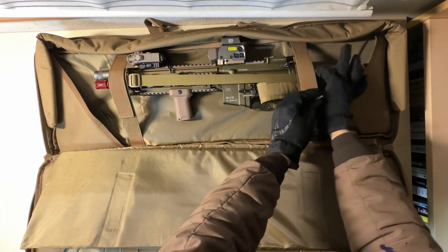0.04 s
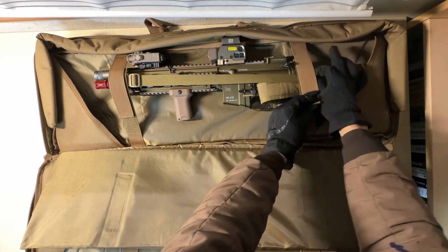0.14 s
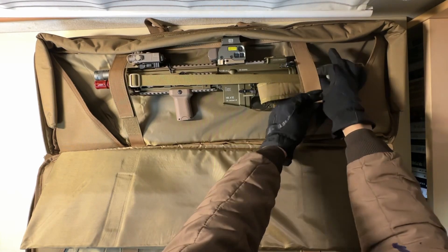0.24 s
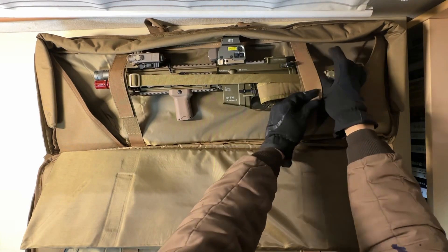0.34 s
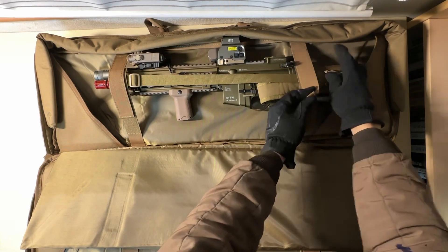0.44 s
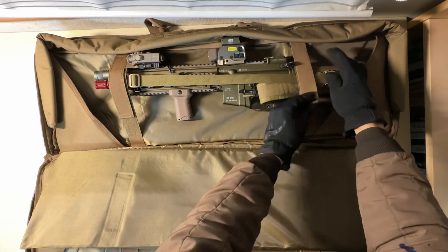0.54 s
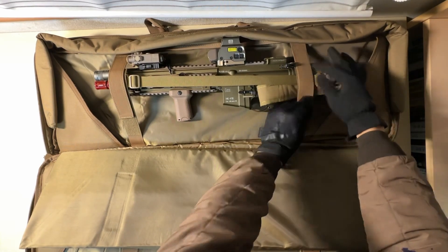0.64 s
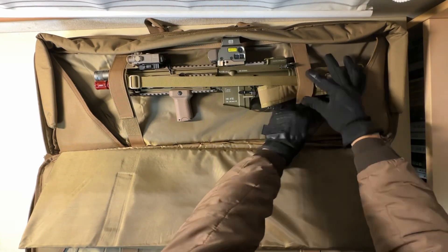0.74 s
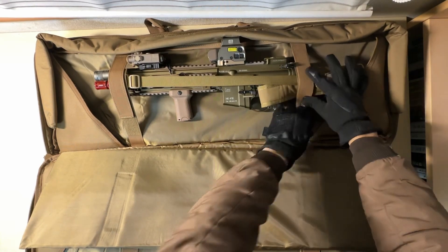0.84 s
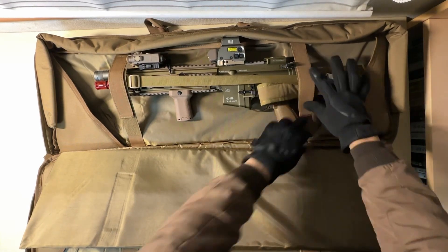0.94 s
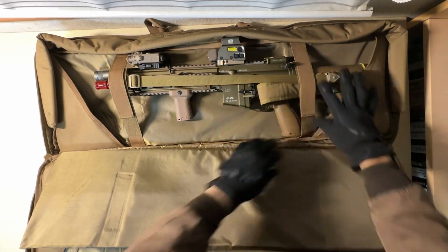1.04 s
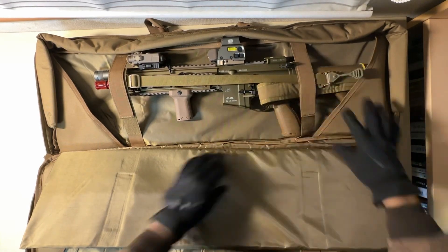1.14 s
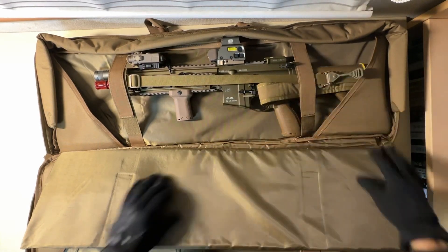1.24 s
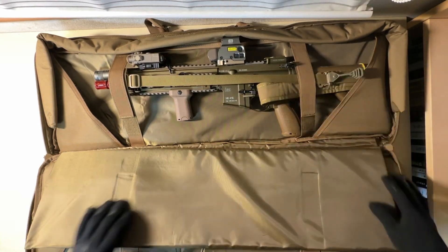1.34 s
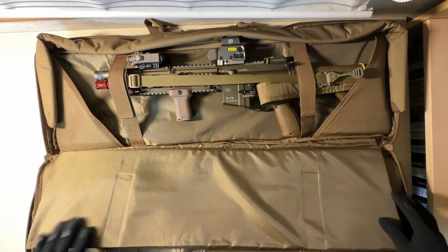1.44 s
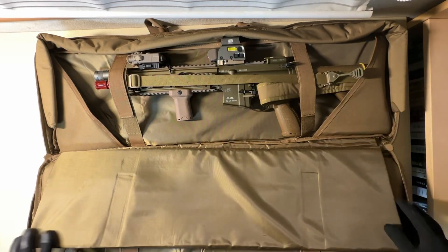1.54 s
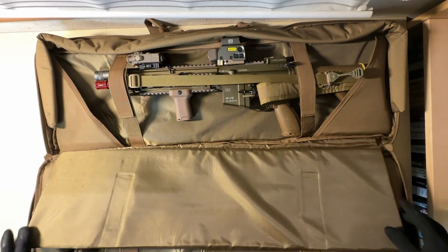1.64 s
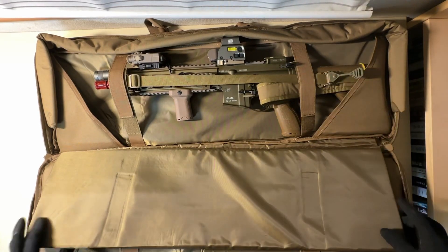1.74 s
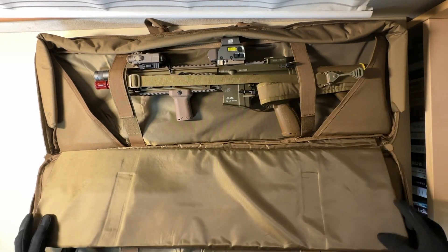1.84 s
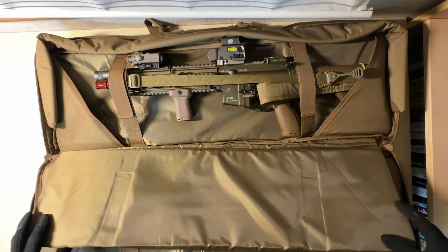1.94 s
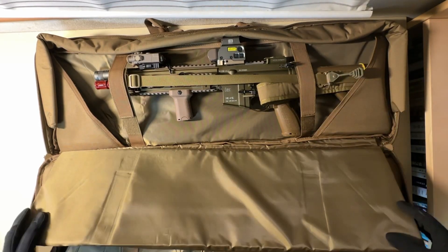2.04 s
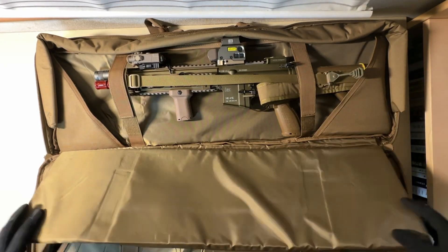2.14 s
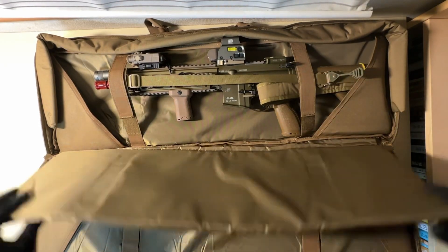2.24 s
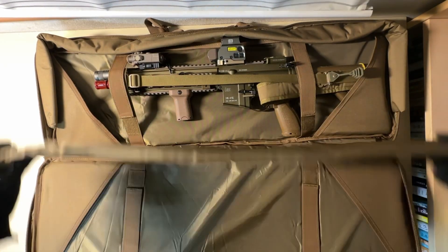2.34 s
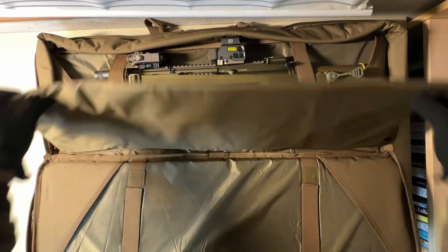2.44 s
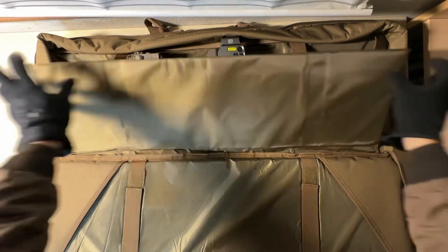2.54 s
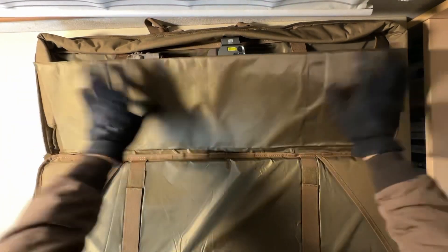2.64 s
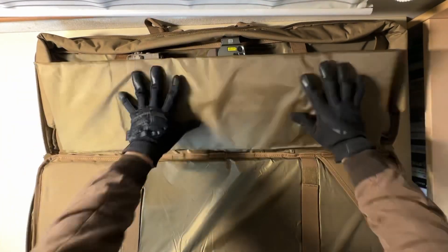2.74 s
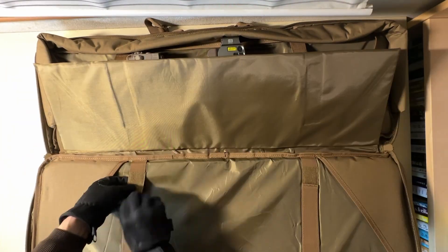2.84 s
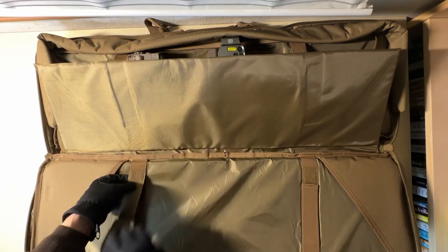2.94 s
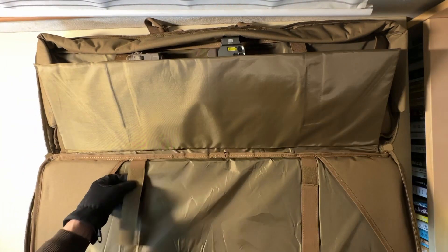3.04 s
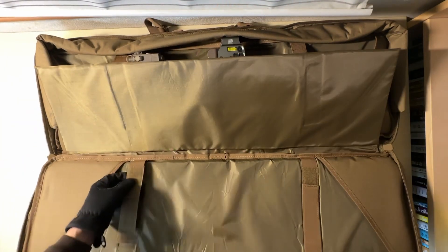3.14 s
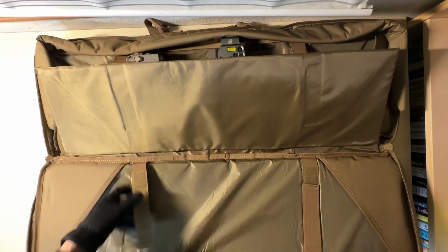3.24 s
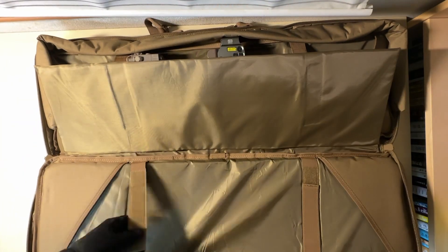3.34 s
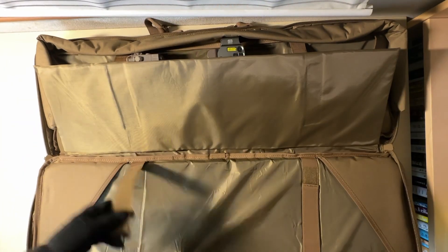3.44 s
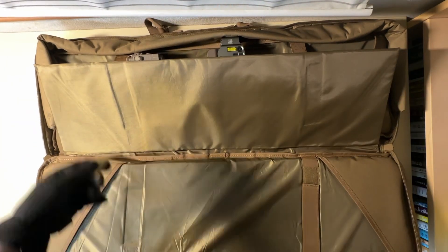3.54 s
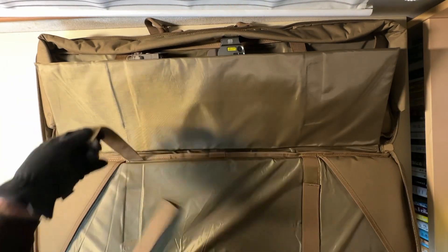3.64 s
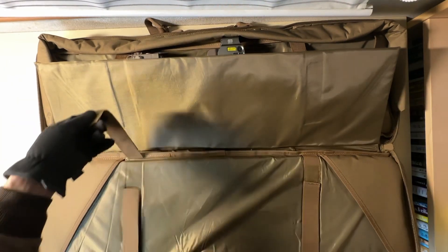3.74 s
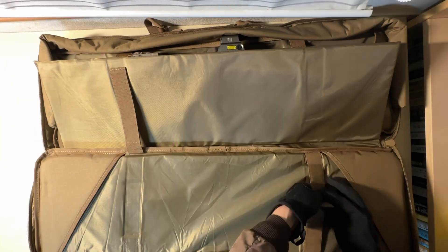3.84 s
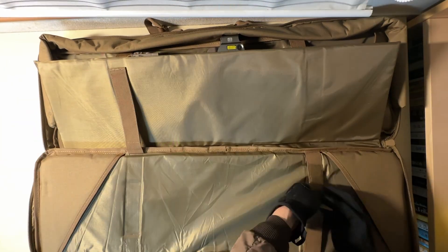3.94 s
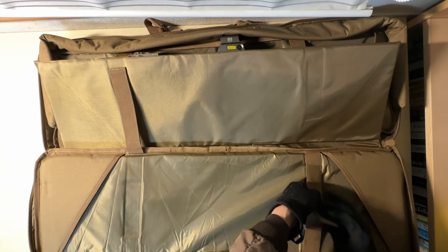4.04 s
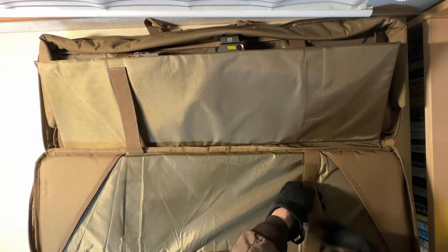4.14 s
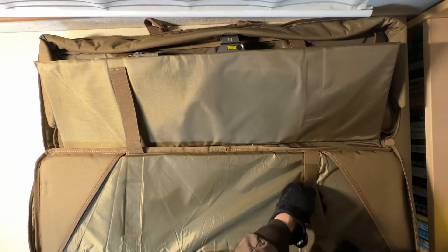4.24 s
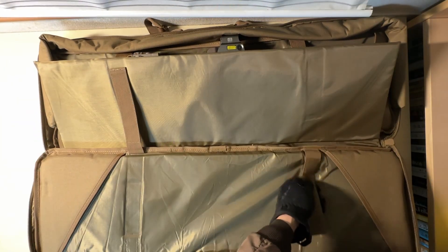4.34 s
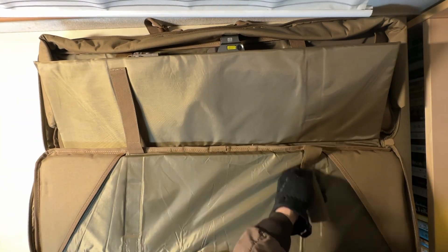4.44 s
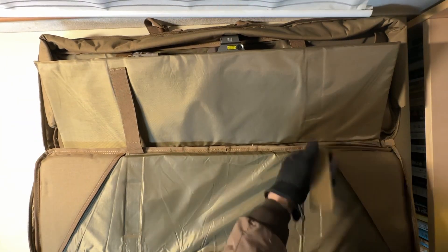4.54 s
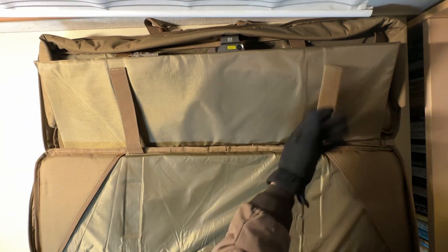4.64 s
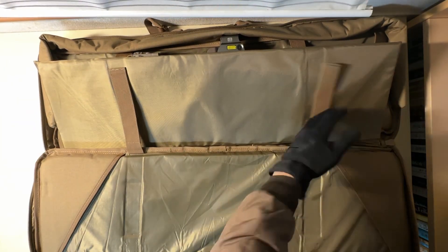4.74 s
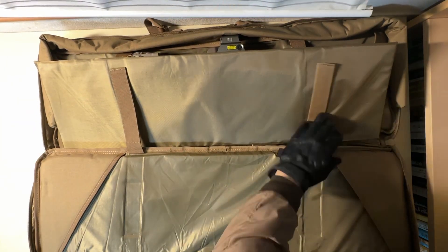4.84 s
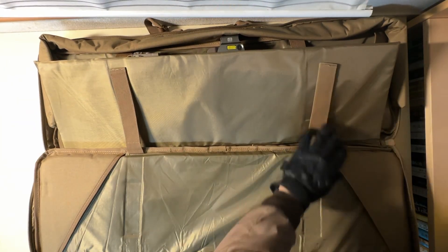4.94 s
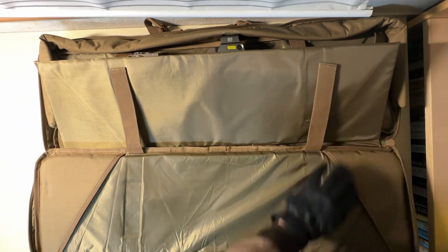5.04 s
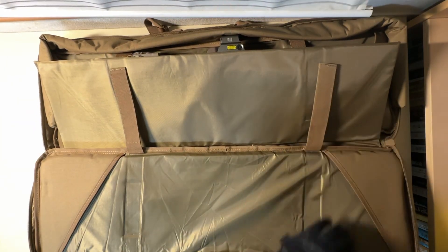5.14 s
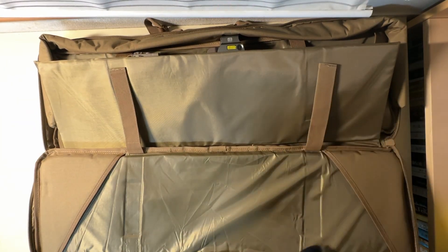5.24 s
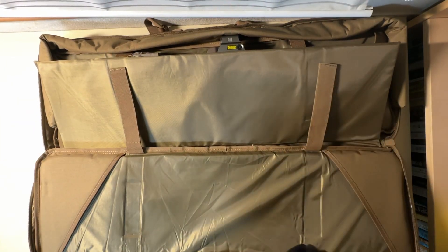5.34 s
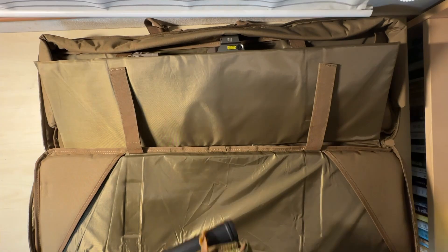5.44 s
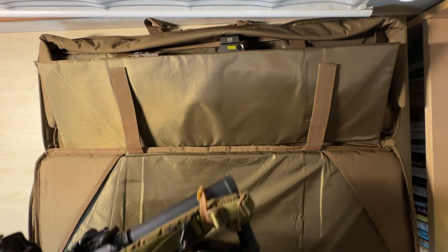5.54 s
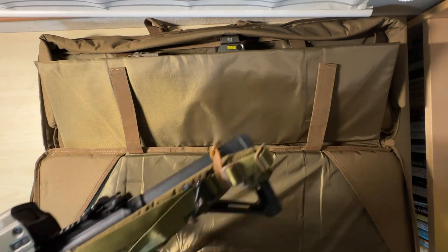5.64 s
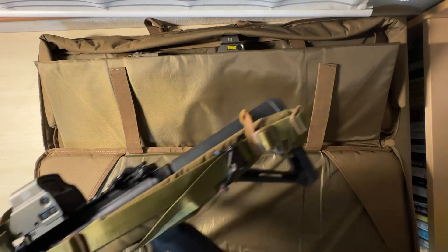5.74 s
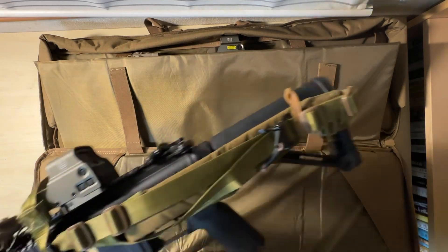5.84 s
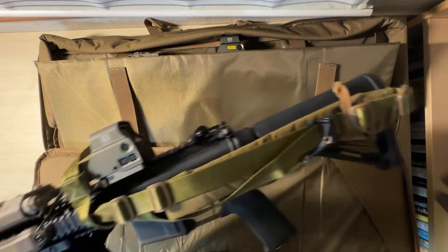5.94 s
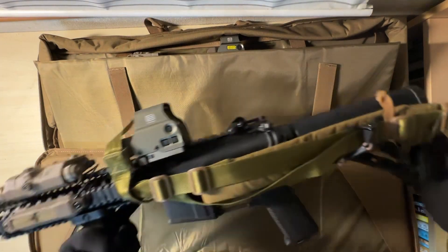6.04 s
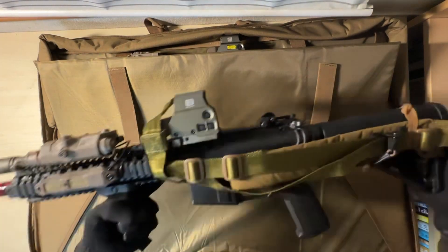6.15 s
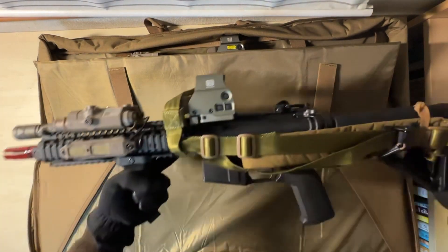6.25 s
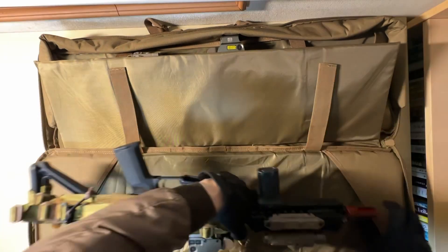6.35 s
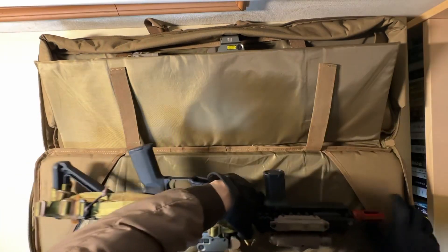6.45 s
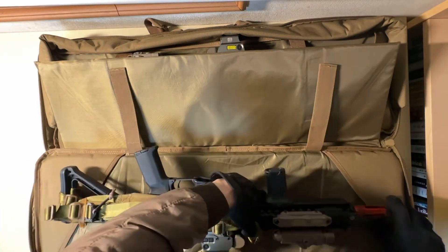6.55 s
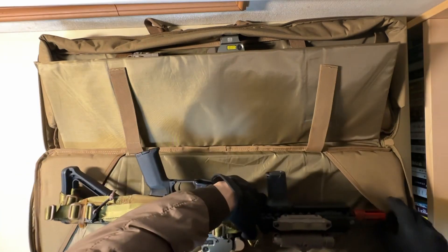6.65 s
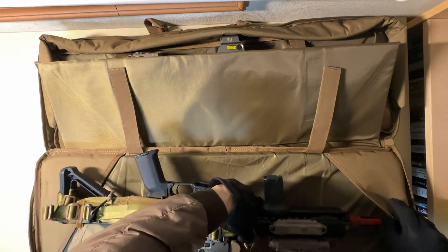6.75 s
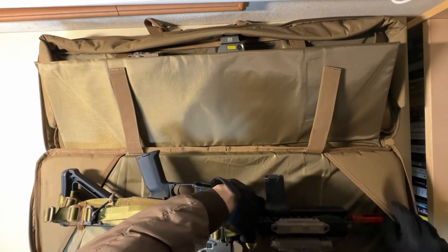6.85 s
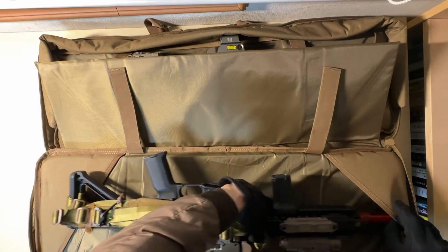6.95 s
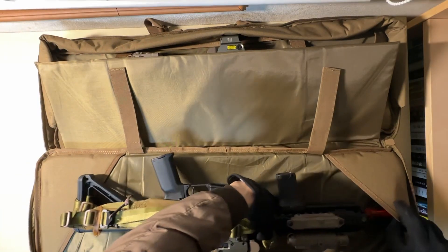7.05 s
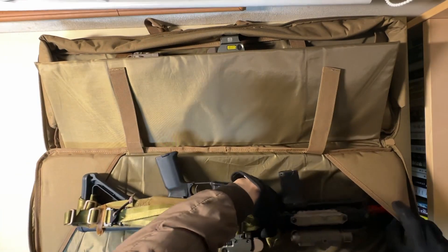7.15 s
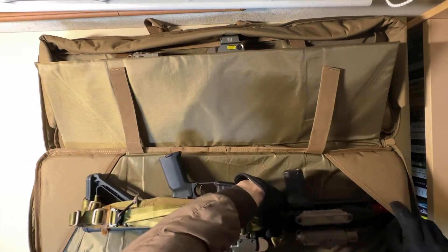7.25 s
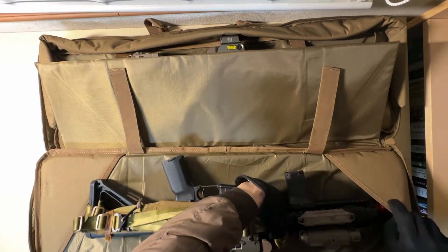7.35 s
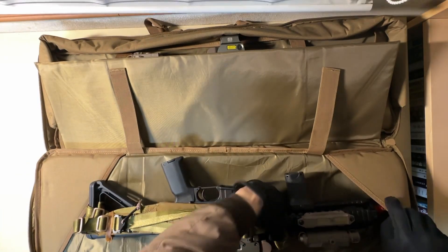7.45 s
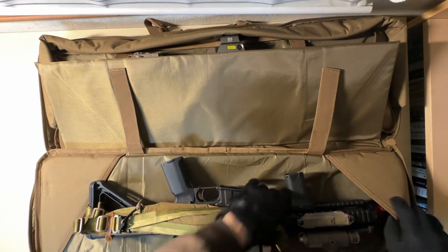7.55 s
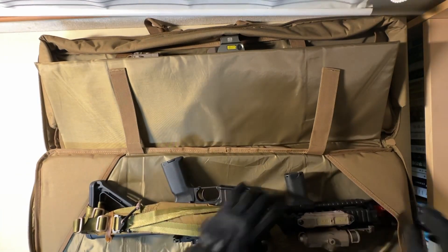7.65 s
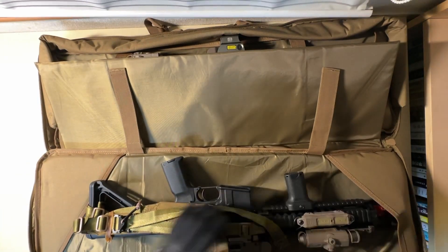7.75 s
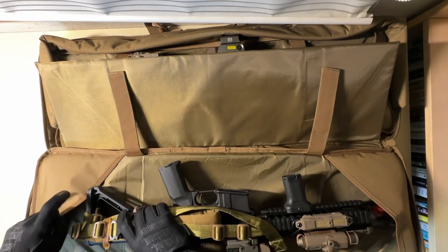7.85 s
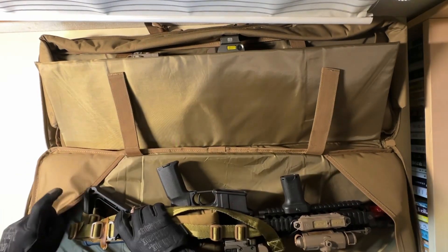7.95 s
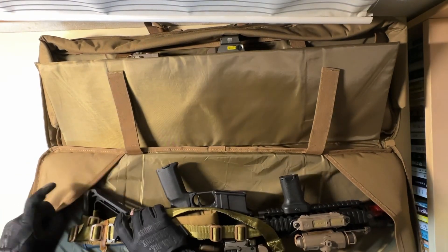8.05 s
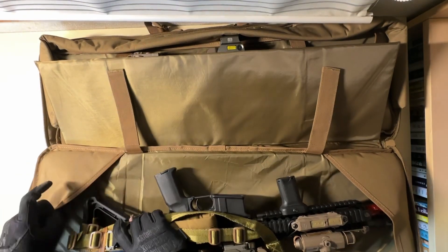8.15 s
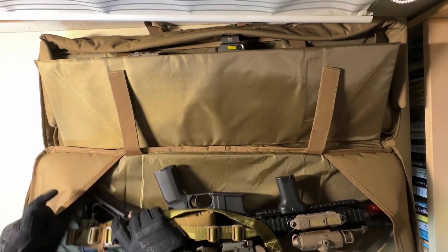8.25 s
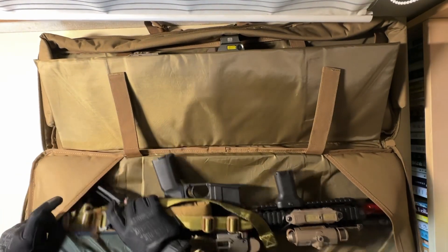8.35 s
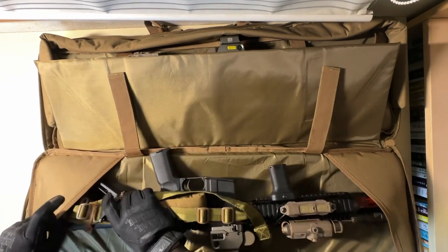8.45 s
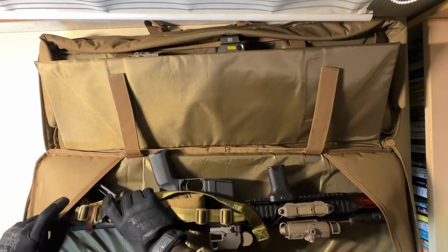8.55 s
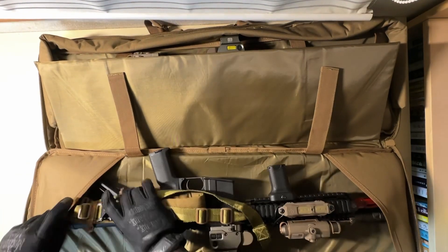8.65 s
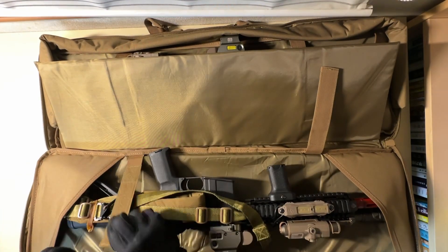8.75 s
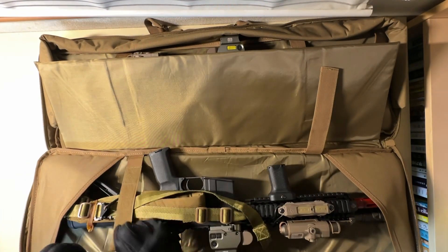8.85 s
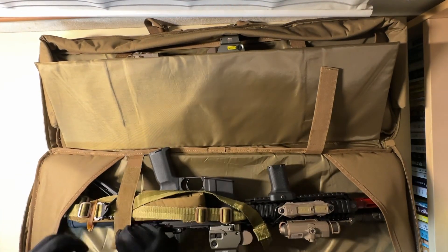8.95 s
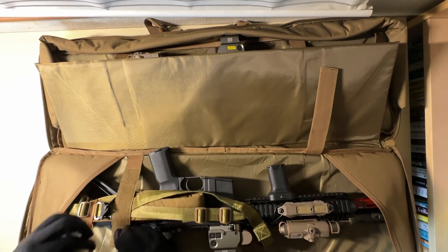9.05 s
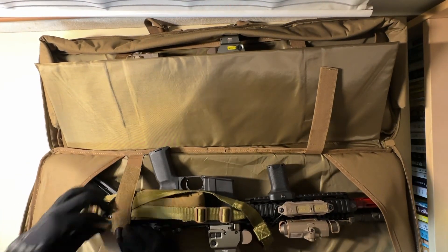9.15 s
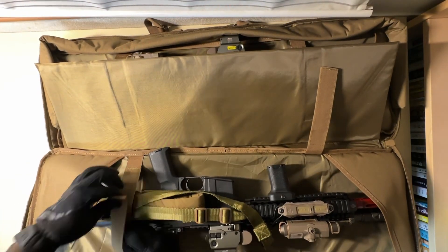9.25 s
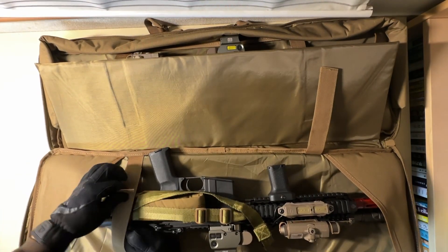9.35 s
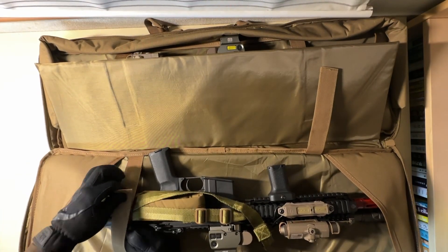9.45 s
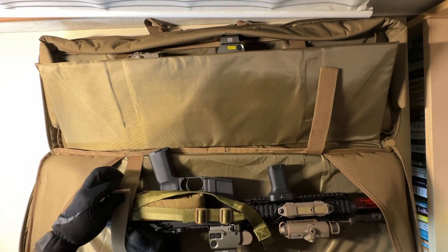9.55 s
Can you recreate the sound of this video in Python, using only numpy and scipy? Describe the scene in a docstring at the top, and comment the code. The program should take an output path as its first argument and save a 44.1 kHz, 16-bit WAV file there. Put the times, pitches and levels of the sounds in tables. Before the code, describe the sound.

Gloved hands rustle padded nylon, two hook-and-loop straps rip open loudly, a strap slaps down, then gear rattles and slides into fabric pockets.

```python
"""Gloved hands pack a padded nylon rifle case on a table in a small room; cloth friction and knocks throughout.
A glove zips over the divider, which swishes as it folds over; a strap rips open in tugs of snapping hooks.
The freed strap rasps away, a second rips open and a loose strap slaps down flat.
A second rifle is lifted with a low modal twang of its spring, rattles, and slides into the fabric pockets.
Friction and hooks are coloured random impulses, knocks are rung resonances; a low drone lies beneath."""
import sys
import numpy as np
from scipy import signal
from scipy.fft import rfft, irfft, next_fast_len
from scipy.io import wavfile
from scipy.ndimage import uniform_filter1d

SR = 44100
rng = np.random.default_rng(int(sys.argv[2]) if len(sys.argv) > 2 else 0)


def file_out(sig):
    """Save sig as 16-bit WAV at sys.argv[1]."""
    # one column per channel
    cols = np.atleast_2d(sig).T
    # limit, then scale
    lim = np.clip(cols, -1, 1)
    pcm = np.round(lim * 32767).astype(np.int16)
    wavfile.write(sys.argv[1], SR, pcm)


N = 422911
TIME = np.arange(N) / SR
HZ = np.fft.rfftfreq(4096, 1 / SR)


def amp(db):
    """Converts dB to amplitude."""
    return 10 ** (np.asarray(db) / 20)


def evened(x):
    """Scales to rms 1."""
    return x / np.sqrt(np.mean(x ** 2) + 1e-20)


def read(points, hz=HZ):
    """Interpolates a spectrum in dB on a log-frequency axis."""
    f, db = np.transpose(points)
    return np.interp(np.log(hz + 1), np.log(f + 1), db)


def add(mix, start_s, sound):
    """Adds a sound into the mix in place, cut at the end."""
    part = mix[max(round(start_s * SR), 0):][:len(sound)]
    part += sound[:len(part)]


def coloured(x, db):
    """Minimum-phase filter shaped by db on the HZ grid, its peak gain set to 0 dB."""
    log_gain = np.log(amp(np.maximum(db - db.max(), -90)))
    circle = np.r_[log_gain, log_gain[-2:0:-1]]
    taps = np.fft.ifft(np.exp(np.conj(signal.hilbert(circle)))).real
    return signal.oaconvolve(x, taps)[:len(x)]


def band(x, lo_hz, hi_hz):
    """Butterworth band-pass."""
    edges_hz = [lo_hz, min(hi_hz, SR * .45)]
    return signal.sosfilt(signal.butter(3, edges_hz, "band", fs=SR, output="sos"), x)


def wander(rate_hz):
    """Slow random signal of rms 1, up to about rate_hz."""
    size = next_fast_len(N, True)
    hz = np.fft.rfftfreq(size, 1 / SR)
    spectrum = rfft(rng.standard_normal(size)) / (1 + (hz / rate_hz) ** 4)
    return evened(irfft(spectrum, size)[:N])


def clicks(per_s, spread_db):
    """Random single-sample impulses of uneven size, rms 1."""
    size = amp(spread_db * np.minimum(rng.exponential(1, N), 4))
    sign = rng.choice([-1, 1], N)
    return evened(size * sign * (rng.random(N) < per_s / SR))


def bump(hz, octaves):
    """Gaussian of height 1 around hz on the HZ grid."""
    return np.exp(-.5 * (np.log2((HZ + 1) / hz) / octaves) ** 2)


def mode(hz, t60):
    """One struck resonance: a decaying sine."""
    t = TIME[:SR // 2]
    return np.sin(2 * np.pi * hz * t) * amp(-60 * t / t60)


def blow(colour_db, t60, chatter, size, bite_s=0.00052):
    """One contact and its dying chatter ring a body; the loudest `size` samples have rms 1."""
    t = TIME[:SR // 2]
    decay = amp(-60 * t / max(t60, .005))
    drive = chatter * rng.standard_normal(len(t)) * decay / np.sqrt(SR * .01)
    drive *= 1 - np.exp(-t / bite_s)
    drive[0] += 1  # first contact
    sound = coloured(drive, colour_db)
    return sound / np.sqrt(uniform_filter1d(sound ** 2, size, mode="constant").max())


CUSHION_S = .0005


def cushioned():
    """Cloth between the parts lets a blow build up over a moment."""
    return 1 - np.exp(-TIME[:SR // 2] / CUSHION_S)


# Cloth spectrum. Each row: frequency in Hz, gain in dB.
CLOTH_SPECTRUM = [(90, 2.5), (284, -4.5), (385, 1), (1720, -2.5), (2530, -7.5), (3700, -5), (6000, -10),
                  (9900, -11.5), (12000, -24.5), (16000, -29.5)]
CRINKLES_PER_S, CRINKLE_OVER_HISS_DB = 62, -12  # small creases popping
TAUT_DB = -46  # hiss level past which crinkles grow no louder: taut cloth


def fabric():
    """Threads catch and slip over one another; creases make the stroke flutter."""
    rumple_db, rub_db, hiss_db, fizz_db = friction_db()
    flutter = wander(37)
    cloth_db = read(CLOTH_SPECTRUM)

    def layer(level_db, lo_hz, hi_hz, slips, flutter_db):
        """One band of slips; a firm, fast stroke runs more evenly."""
        unsteady = np.clip((-52.0 - level_db) / 16, .3, 1)
        return evened(band(slips, lo_hz, hi_hz)) * amp(level_db + flutter_db * unsteady * flutter)

    coarse = coloured(clicks(per_s=650, spread_db=2.0), cloth_db)
    medium = coloured(clicks(per_s=5000, spread_db=3.5), cloth_db)
    fine = coloured(clicks(per_s=19000, spread_db=4.0), cloth_db)
    rumple = layer(rumple_db, 83, 447, coarse, flutter_db=3.5)
    rub = layer(rub_db, 500, 2710, medium, flutter_db=1.16)
    hiss = layer(hiss_db, 2810, 20000, fine, flutter_db=1.5)
    fizz = layer(fizz_db, 7500, 15000, clicks(per_s=9500, spread_db=6), flutter_db=5.8)
    pops = coloured(clicks(CRINKLES_PER_S, spread_db=0.5), cloth_db)
    crinkle_db = np.minimum(hiss_db, TAUT_DB) + CRINKLE_OVER_HISS_DB
    crinkles = layer(crinkle_db, 900, 15000, pops, flutter_db=2.0)
    return folds(rumple + rub + hiss + fizz) + crinkles


# Steady rustle of the arms. Each row: time in seconds, rub level in dB.
SLEEVE_RUSTLE = [(0, -62.5), (3.9, -64), (4.45, -57), (5.2, -64), (5.7, -74), (6, -66.5), (7.7, -66.5),
                 (8.5, -58.5), (9.59, -69.5)]
SLEEVE_RUMPLE_DB, SLEEVE_HISS_DB, SLEEVE_FIZZ_DB = -0.5, -1, -11.5  # over rub
# Nylon sliding over nylon. Each row: start in seconds, length in seconds, rub level in dB,
# hiss over rub in dB, top fizz over hiss in dB.
SLIDE_EVENTS = [(0.122, 0.15, -56, 4.5, 0.5), (0.356, 0.084, -53, 7.5, -6), (0.602, 0.22, -57, 0.5, -11),
                (1.35, 0.28, -63.5, 10, -11), (1.752, 0.4, -56.5, 0, -29), (2.254, 0.13, -60, 2, -19),
                (2.486, 0.1, -51, 6.5, -5), (3.517, 0.19, -52, -1.5, -1), (4.578, 0.043, -59, 11.5, -18),
                (4.865, 0.15, -66.5, 13, 3), (5.481, 0.06, -64.5, 12, -31), (5.754, 0.097, -64, 8.5, -26),
                (6.448, 0.15, -54, 1.5, -24), (6.641, 0.16, -49.5, 5, -9), (6.782, 0.43, -48, 7.5, -6.5),
                (7.101, 0.29, -47, 5.5, -17), (7.46, 0.17, -54, -0.5, -11.5), (8.201, 0.37, -45, 5.5, -17),
                (8.44, 0.082, -53, 8.5, -23), (9.461, 0.074, -66.5, 16, -0.5)]
# A hand or rifle landing on the padding and dragging. Each row: start in seconds, hold in seconds,
# rub level in dB, rumple over rub in dB.
PRESS_EVENTS = [(0.291, 0.019, -45.5, -6), (0.726, 0.086, -50.5, 3), (0.937, 0.033, -53, -9),
                (1.269, 0.14, -49.5, -18), (2.373, 0.29, -52, 0), (2.589, 0.025, -44, 5),
                (2.754, 0.11, -43.5, 8), (2.782, 0.03, -37, -9), (3.115, 0.27, -45.5, 8.5),
                (3.673, 0.12, -40.5, -16), (4.34, 0.1, -44.5, 0), (4.797, 0.019, -47.5, 8),
                (5.006, 0.09, -52, 11), (5.368, 0.082, -57.5, 13), (6.5, 0.022, -43.5, 6),
                (6.53, 0.17, -51, -2), (7.368, 0.085, -55.5, 4), (7.82, 0.16, -51, -2),
                (7.893, 0.074, -47, -0.5), (8.055, 0.14, -47, 1), (8.537, 0.061, -52, 7.5),
                (8.96, 0.3, -56.5, 0), (9.255, 0.062, -49.5, 1)]


def friction_db():
    """Levels of padding rumple, cloth rub, weave hiss and top fizz: sleeves, slides and presses add in power."""
    offsets_db = np.c_[[SLEEVE_RUMPLE_DB, 0, SLEEVE_HISS_DB, SLEEVE_FIZZ_DB]]
    power = amp(np.interp(TIME, *np.transpose(SLEEVE_RUSTLE)) + offsets_db) ** 2
    for gesture, rows in (slide, SLIDE_EVENTS), (press, PRESS_EVENTS):
        for start_s, *shape in rows:
            for total, level in zip(power, gesture(*shape)):
                add(total, start_s, level ** 2)
    return 10 * np.log10(power)


RUB_EXPONENT, HISS_EXPONENT = 0.63, 1.47  # powers of speed: hiss grows faster
SLIDE_RUMPLE_DB = -5.5  # over rub: the padding is barely stirred


def slide(length_s, rub_db, hiss_db, fizz_db):
    """Rumple, rub, hiss and fizz of a slide that speeds up and slows down."""
    speed = np.abs(np.sin(np.pi * np.arange(0, length_s, 1 / SR) / length_s))
    rub = amp(rub_db) * speed ** RUB_EXPONENT
    hiss = amp(rub_db + hiss_db) * speed ** HISS_EXPONENT
    return amp(SLIDE_RUMPLE_DB) * rub, rub, hiss, amp(fizz_db) * hiss


PRESS_ATTACK_S, PRESS_RELEASE_S, PRESS_SAG_DB = 0.0099, .016, -5.5
PRESS_HISS_DB, PRESS_FIZZ_DB = -2.5, -18  # over rub, before muffling
MUFFLING_DB_PER_DB = 0.25  # treble lost per dB of rumple as the hand sinks in


def press(hold_s, rub_db, rumple_db):
    """Rumple, rub, hiss and fizz of a contact that lands quickly, eases and stops."""
    t = TIME[:SR // 2]
    release = np.exp(-np.maximum(t - hold_s, 0) / PRESS_RELEASE_S)
    held = np.minimum(t / PRESS_ATTACK_S, 1) * release
    rub = held * amp(rub_db + PRESS_SAG_DB * np.minimum(t / hold_s, 1))
    muffled = amp(-MUFFLING_DB_PER_DB * rumple_db) * rub
    return amp(rumple_db) * rub, rub, amp(PRESS_HISS_DB) * muffled, amp(PRESS_FIZZ_DB) * muffled


def folds(x, patchy_db=2.2):
    """Folds open and close under the hand, so the colour of the rubbing keeps shifting."""
    z = signal.stft(x, nperseg=1024)[2]
    over_hz = uniform_filter1d(rng.standard_normal(z.shape), size=6, axis=0)
    patches = evened(uniform_filter1d(over_hz, size=5, axis=1))
    return signal.istft(z * amp(patchy_db * patches), nperseg=1024)[1][:N]


# Tugs opening both straps. Each row: start in seconds, length in seconds, level in dB.
STRAP_TUGS = [(2.877, 0.008, -25), (2.891, 0.018, -22.5), (2.912, 0.035, -21), (2.94, 0.055, -17.5),
              (3.0, .056, -16.5), (3.065, 0.013, -14.5), (4.028, 0.016, -31.5), (4.057, .007, -25.5),
              (4.074, 0.0084, -23), (4.098, 0.036, -24), (4.141, .025, -21), (4.169, 0.02, -25),
              (4.195, .02, -21.5), (4.234, .019, -20), (4.263, 0.031, -24), (4.306, 0.026, -22.5),
              (4.327, 0.029, -29.5)]
SECOND_STRAP_FROM_S = 3.5
# Webbing spectra of the two straps. Each row: frequency in Hz, gain in dB.
FIRST_WEBBING = [(90, -7.5), (250, -16.5), (540, -2.5), (1200, -6), (2150, -11), (3000, -8.5), (3900, 0),
                 (5600, 1), (7000, -3), (9700, 0.5), (12200, -6), (16000, -8.5)]
SECOND_WEBBING = [(90, 0), (250, 1.5), (550, 1.5), (2500, -2), (8000, 0.5), (9700, 5.5), (12000, -5.5),
                  (16000, -8.5)]


def straps():
    """The pull frees rows of hooks; their snaps ring the taut webbing."""
    def peel(tugs, webbing, rows_db, spread_db):
        """One strap; rows_db sets how unevenly its rows of hooks let go."""
        rows = amp(rows_db * np.tanh(wander(rate_hz=480)))
        hooks = pull(tugs) * evened(clicks(11000, spread_db) * rows)
        return evened(coloured(hooks, read(webbing))) * np.std(hooks)

    first = [tug for tug in STRAP_TUGS if tug[0] < SECOND_STRAP_FROM_S]
    second = STRAP_TUGS[len(first):]
    first_rip = peel(first, FIRST_WEBBING, rows_db=2.5, spread_db=1.2)
    return first_rip + peel(second, SECOND_WEBBING, rows_db=4.5, spread_db=2.9)


RIP_ATTACK_S, RIP_RELEASE_S = .001, .005
PATCHES_PER_S, PATCHES_DB = 130, 2.2  # uneven hold along the strap


def pull(tugs):
    """Strength of the peeling: each tug bites at once, runs over uneven patches and lets go."""
    power, t = np.zeros(N), TIME[:SR // 2]
    for start_s, length_s, db in tugs:
        release = np.exp(-np.maximum(t - length_s, 0) / RIP_RELEASE_S)
        peeling = (1 - np.exp(-t / RIP_ATTACK_S)) * release
        add(power, start_s, (amp(db) * peeling) ** 2)
    return np.sqrt(power) * amp(PATCHES_DB * np.tanh(wander(PATCHES_PER_S)))


DRAG_FROM_S, DRAG_TO_S = 3.785, 3.8445  # until the strap's end lifts clear
# Dragged webbing spectrum. Each row: frequency in Hz, gain in dB.
DRAG_SPECTRUM = [(120, -8), (950, 3), (1400, -9.5), (4500, -22.5), (15000, -35)]


def drag(level_db=-37, hem_db=6, hem_s=0.01):
    """Freed webbing rasps over the padding; its thick hem catches last, and the sound stops dead."""
    start = np.clip((TIME - DRAG_FROM_S) / .01, 0, 1)
    stop = np.clip((DRAG_TO_S - TIME) / .002, 0, 1)
    hem = np.exp(-np.abs(DRAG_TO_S - TIME) / hem_s)
    rasp = evened(coloured(clicks(per_s=4800, spread_db=3.5), read(DRAG_SPECTRUM)))
    return start * stop * amp(level_db + hem_db * hem) * rasp


SLAP_S, SLAP_DB = 4.7056, -11
# Strap smack spectrum. Each row: frequency in Hz, gain in dB.
SLAP_SPECTRUM = [(60, -22.5), (200, -7.5), (400, 0), (800, -2), (1150, -13.5), (2200, -20), (9000, -24),
                 (15000, -49)]


def slap(pad_hz=440, pad_t60=.022):
    """The loose strap lands flat; the padding under it bobs for a few cycles."""
    smack = blow(read(SLAP_SPECTRUM), t60=.014, chatter=2.5, size=150)
    out = np.zeros(N)
    add(out, SLAP_S, amp(SLAP_DB) * (smack + 2 * mode(pad_hz, pad_t60)) * cushioned())
    return out


def handling():
    """Snaps of nylon, clacks of hardware and thuds of the case, each a struck resonance."""
    return snaps() + clacks() + thuds()


# A few hooks or a stiff crease snapping. Each row: start in seconds, level in dB.
SNAP_EVENTS = [(0.023, -38.5), (0.417, -32), (0.4314, -22), (0.451, -29), (0.564, -51), (3.68, -22),
               (3.69, -36), (4.665, -49), (8.499, -36), (9.206, -46), (9.269, -37.5), (9.303, -38.5),
               (9.3402, -36), (9.499, -44)]
# Snap spectrum. Each row: frequency in Hz, gain in dB.
SNAP_SPECTRUM = [(120, -17), (250, 2), (1700, -6), (4800, 3.5), (10000, -3), (16000, -24)]


def snaps():
    """Hooks or creases let go in brief chattering bursts."""
    out = np.zeros(N)
    for start_s, db in SNAP_EVENTS:
        add(out, start_s, amp(db) * blow(read(SNAP_SPECTRUM), t60=0.015, chatter=14.0, size=100))
    return out


# Rifle parts and sling fittings knocking. Each row: start in seconds, level in dB,
# strongest ring in Hz, treble lift in dB, ring t60 in seconds.
CLACK_EVENTS = [(0.302, -43.5, 2000, 3, 0.031), (2.437, -42, 3150, 2, 0.02),
                (3.165, -32.5, 1700, -22, 0.035), (3.178, -29, 1430, -29, 0.068),
                (3.257, -24, 1434, -15, 0.15), (3.318, -17.5, 930, -4.5, 0.042),
                (3.358, -24, 840, -25, 0.033), (3.71, -28.5, 860, -8, 0.019), (3.776, -28, 886, -20, 0.059),
                (4.379, -35.5, 855, 11, 0.032), (6.118, -30, 1710, 12.5, 0.016), (6.136, -32, 1770, 7, .01),
                (6.146, -28.5, 1920, 4.5, .014), (6.165, -31.5, 1820, 1, 0.015),
                (6.192, -35.5, 2195, 3, 0.027), (6.514, -32.5, 1640, 23, 0.013),
                (6.527, -28.5, 1960, 13, 0.031), (6.535, -27.5, 1690, 18, 0.029),
                (7.045, -31.5, 1150, 5, 0.025), (7.211, -29.5, 1540, 19, 0.023),
                (7.275, -33, 1695, 10, 0.033), (8.524, -37, 1640, -6, 0.047), (8.586, -30, 1560, 12, 0.01),
                (8.983, -38.5, 1880, 4, 0.033), (9.04, -30, 1810, -8, 0.066)]
LIFTED_S, LAID_DOWN_S = 5, 6.4  # second rifle in the air between


def clacks():
    """Hardware knocks, packed before the lift, then in the air or loose."""
    out = np.zeros(N)
    for start_s, db, hz, treble_db, ring_t60 in CLACK_EVENTS:
        held = LIFTED_S < start_s < LAID_DOWN_S
        add(out, start_s, amp(db) * clack(hz, treble_db, ring_t60, start_s < LIFTED_S, held))
    return out


# Contact spectrum of the fittings. Each row: frequency in Hz, gain in dB.
FITTING_SPECTRUM = [(150, -22), (350, 6.5), (700, 2.5), (1800, 1.5), (3900, -11), (14000, -37)]
# Modes of a struck fitting. Each row: multiple of its strongest ring, level in dB.
RING_MODES = [(1, 0), (0.9, -6), (1.31, -9), (1.79, -10)]
FITTING_OCTAVES = 0.33  # Gaussian sigma of a resonance
PACKED_T60_S, PACKED_CHATTER = 0.086, 5.9  # packed gear chatters on
LOOSE_T60_S, LOOSE_CHATTER = .018, 5.0  # single fittings just click


def clack(hz, treble_db, ring_t60, packed, held, ring_db=-2, stock_hz=780, stock_db=7):
    """A hard contact, chatter and a ring trembling in its seat; held in the air, the stock sounds too."""
    t60, chatter = (PACKED_T60_S, PACKED_CHATTER) if packed else (LOOSE_T60_S, LOOSE_CHATTER)
    treble = treble_db * np.clip(np.log2((HZ + 1) / 2300), 0, 1)
    thin_db = -2 * np.maximum(np.log2(hz / (HZ + 1)), 0)  # small parts give little bass
    body = 8 * bump(hz, FITTING_OCTAVES) + held * stock_db * bump(stock_hz, FITTING_OCTAVES)
    colour_db = read(FITTING_SPECTRUM) + body + treble + thin_db
    contact = blow(colour_db, t60, chatter, size=100, bite_s=0.00073)
    tremble = 1 + .5 * evened(uniform_filter1d(rng.standard_normal(len(contact)), size=120))
    modes = sum(amp(db) * mode(hz * multiple, ring_t60) for multiple, db in RING_MODES)
    return (contact + amp(ring_db) * tremble * modes) * cushioned()


# Soft blows on the padded case. Each row: start in seconds, level in dB, main ring in Hz, table sway in dB.
THUD_EVENTS = [(0.43, -41, 337, -41), (0.766, -40, 450, -49), (1.267, -44, 123, -38),
               (2.597, -31, 330, -43), (2.614, -35, 300, -48), (2.784, -29, 252, -39),
               (3.074, -30.5, 543, -30.5), (3.132, -23.5, 360, -27), (3.274, -19.5, 140, -27),
               (3.681, -25, 340, -33), (6.545, -47, 120, -30), (8.59, -49, 113, -38),
               (9.034, -32, 150, -35)]
# Padding spectrum. Each row: frequency in Hz, gain in dB.
PADDING_SPECTRUM = [(30, -20.5), (60, 1.5), (450, -4.5), (1400, -26.5), (3300, -71)]


def thuds():
    """The padding puffs and rings at its main mode while the table sways."""
    out = np.zeros(N)
    for start_s, db, hz, sway_db in THUD_EVENTS:
        colour_db = read(PADDING_SPECTRUM) + 10 * bump(hz, octaves=0.65)
        puff = blow(colour_db, t60=0.09, chatter=1.2, size=250)
        push = mode(hz, t60=8 / hz)
        add(out, start_s, amp(db) * (puff + push) * cushioned() + amp(sway_db) * sway())
    return out


SWAY_HZ, SWAY_RISE_S = 68, .018


def sway():
    """The loaded table takes up a blow, bobs for a few cycles and settles."""
    t = TIME[:SR // 2]
    return np.sin(2 * np.pi * SWAY_HZ * t) * t / SWAY_RISE_S * np.exp(1 - t / SWAY_RISE_S)


# Spring modes. Each row: frequency in Hz, relative level in dB, t60 in seconds.
SPRING_MODES = [(66.7, 4, 3.3), (104.5, 1.5, 1.5), (287, -1, 1.55), (372, -5, 2.7), (474, 1, 1.1),
                (558, -5.5, 1.25), (640, -7, 1), (656, -6, 0.74), (1084, -20, 0.78), (1310, -15.5, 3.7)]
RING_FROM_S, RING_TO_S = 5.015, 5.485  # set ringing, damped


def metal(level_db=-42, rise_s=0.0037, grip_s=0.0069):
    """A jolt sets the spring's modes ringing, each buzzing unevenly against its tube, until they are damped."""
    t = np.maximum(TIME - RING_FROM_S, 0)
    modes = 0
    for hz, db, t60 in SPRING_MODES:
        buzz = wander(rate_hz=34) * hz / (hz + 200)  # higher modes buzz more
        level = amp(db - 60 * t / t60 + 3.5 * buzz)
        phase = 2 * np.pi * (hz * t + rng.random()) + .8 * np.roll(buzz, SR)
        modes = modes + level * np.sin(phase)
    free = (1 - np.exp(-t / rise_s)) * np.clip((RING_TO_S - TIME) / grip_s, 0, 1)
    return amp(level_db) * free * modes


# Divider swish spectrum. Each row: frequency in Hz, gain in dB.
FLAP_SPECTRUM = [(150, -15), (900, -3.5), (4300, -7.5), (16000, -33)]
FLAP_S, FLAP_DB, FLAP_WIDTH_S = 2.247, -37, 0.022  # fastest moment, peak level, half-width


def flap():
    """The divider's nylon swishes in one soft swell as it is swung up."""
    speed = 1 / (1 + ((TIME - FLAP_S) / FLAP_WIDTH_S) ** 2)
    swish = evened(coloured(clicks(per_s=5500, spread_db=1.0), read(FLAP_SPECTRUM)))
    return amp(FLAP_DB) * speed * swish


SWIPE_S = 1.27


def swipe(start_hz=2150, slowing_per_s=0.92, level_db=-48, t60=1.0):
    """A glove skims the divider's weave: a fuzzy zip whose pitch falls as the hand slows."""
    t = TIME[:SR]
    hz = start_hz * np.exp(-slowing_per_s * t) * (1 + 0.041 * wander(320)[:SR])
    zip_tone = np.sin(2 * np.pi * np.cumsum(hz) / SR) * wander(180)[:SR]
    out = np.zeros(N)
    add(out, SWIPE_S, amp(level_db - 60 * t / t60) * zip_tone)
    return out


def nearby(x, level_db=-8):
    """The table top and the shelves around it return a few early echoes that ripple the treble."""
    echoes = np.zeros(N)
    echoes[rng.integers(SR // 1000, SR // 125, size=14)] = rng.choice([-1, 1], size=14)
    echoes = band(echoes[:SR // 50] / np.linalg.norm(echoes), 1190, 8900)
    return x + amp(level_db) * signal.oaconvolve(x, echoes)[:N]


def room(x, bass_t60=0.19, treble_t60=0.12):
    """A short tail of sparse reflections; treble dies first."""
    size = SR // 2
    sparse = rng.random(size) < 3000 / SR
    taps = rng.standard_normal(size) * sparse * (TIME[:size] > .004)
    hz, t, z = signal.stft(taps, SR, nperseg=256)
    t60 = read([(200, bass_t60), (9000, treble_t60)], hz)[:, None]
    tail = signal.istft(z * amp(-60 * t / t60), SR, nperseg=256)[1]
    return signal.oaconvolve(x, tail / np.linalg.norm(tail))[:N]


# Room drone level. Each row: time in seconds, level in dB.
DRONE_LEVEL = [(0, -51.5), (1.3, -48.5), (2, -56.5), (3, -43), (4.2, -51.5), (5.2, -49), (5.6, -62),
               (7.2, -53), (7.8, -59), (9.6, -54.5)]
# Drone spectrum. Each row: frequency in Hz, gain in dB.
DRONE_SPECTRUM = [(36, -21.5), (50, 7.5), (62, -6.5), (80, -10.5), (250, -55)]


def drone():
    """A low rumble in the room: coloured noise with its envelope evened out."""
    low = signal.hilbert(coloured(rng.standard_normal(N), read(DRONE_SPECTRUM)))
    steady = evened(low.real / (abs(low) + abs(low).mean()))
    return steady * amp(np.interp(TIME, *np.transpose(DRONE_LEVEL)))


def scene():
    """Sums all sources; rips, knocks and slap also excite the room."""
    peeled, knocks, slapped = straps(), handling(), slap()
    reflected = room(amp(-9.5) * peeled + amp(-9.0) * knocks + amp(-13) * slapped)
    close = nearby(peeled + knocks + slapped + fabric() + flap() + drag())
    return (close + reflected + swipe() + metal() + drone())[None]


# Microphone port notches. Each row: frequency in Hz, Gaussian sigma in Hz, depth in dB.
PORT_CUTS = [(5220, 32, 8.5), (7534, 274, 6.5)]
CEILING = .75  # peaks round off toward this, full scale 1
BASS_CUT_HZ, EDGE_HZ = 42, 15900


def record(dry):
    """Rounds off peaks, cuts the port's two narrow notches and the deepest bass, then limits the band."""
    port_db = -sum(depth * np.exp(-.5 * ((HZ - hz) / width) ** 2) for hz, width, depth in PORT_CUTS)
    rounded = CEILING * np.tanh(dry[0] / CEILING)
    bass_cut = signal.butter(4, BASS_CUT_HZ, "high", fs=SR, output="sos")
    heard = signal.sosfilt(bass_cut, coloured(rounded, port_db))
    edge = signal.firwin(511, EDGE_HZ, window=("kaiser", 9), fs=SR)
    return signal.oaconvolve(heard, edge, "same")[None]


dry = scene()
out = record(dry)
file_out(out)
```